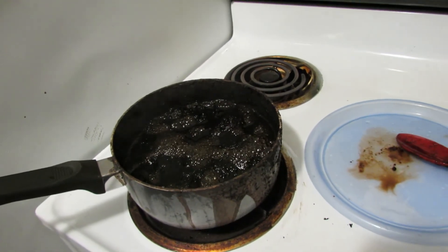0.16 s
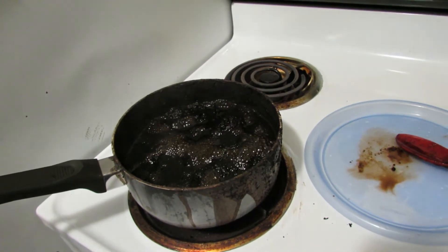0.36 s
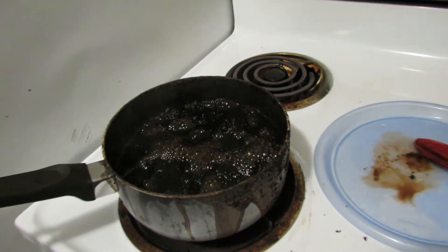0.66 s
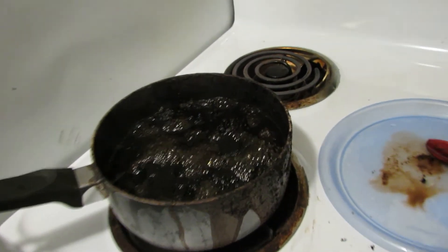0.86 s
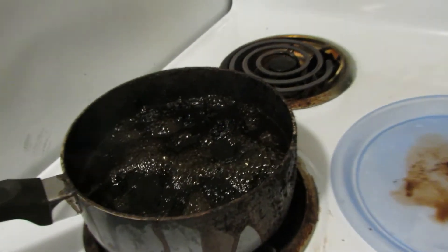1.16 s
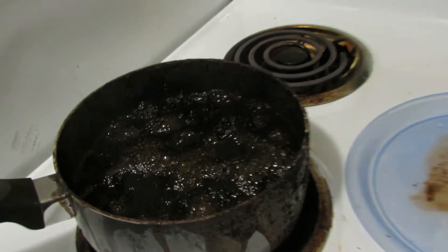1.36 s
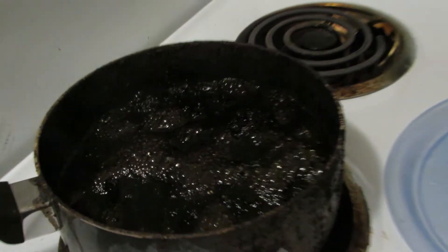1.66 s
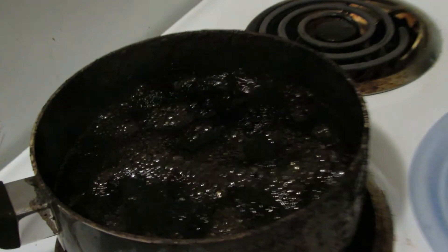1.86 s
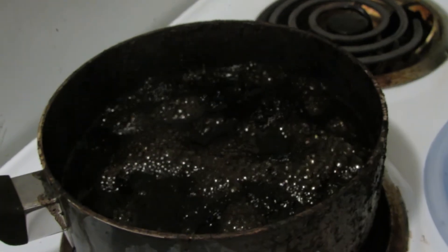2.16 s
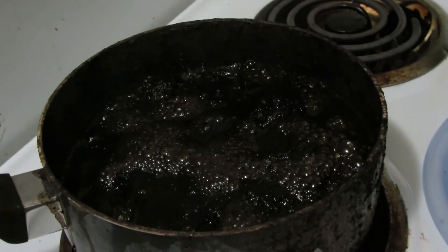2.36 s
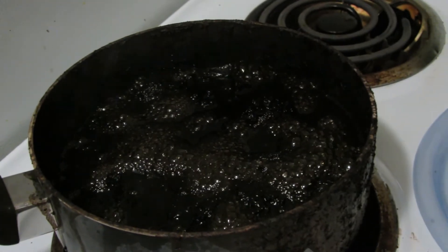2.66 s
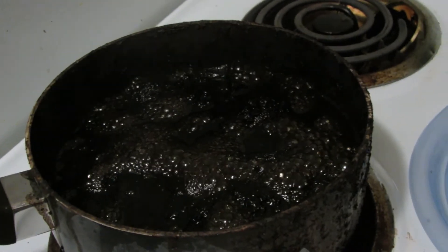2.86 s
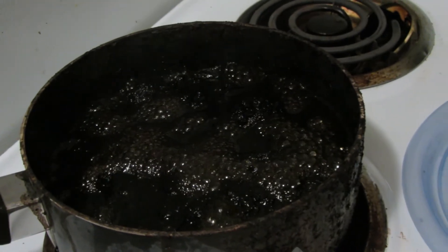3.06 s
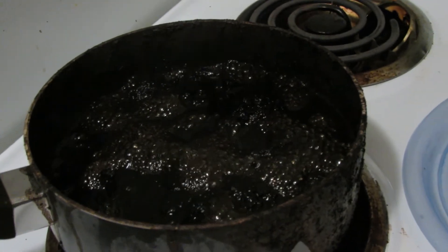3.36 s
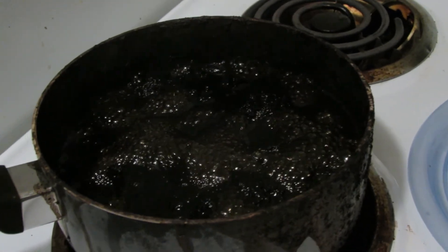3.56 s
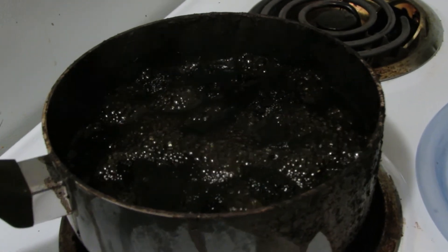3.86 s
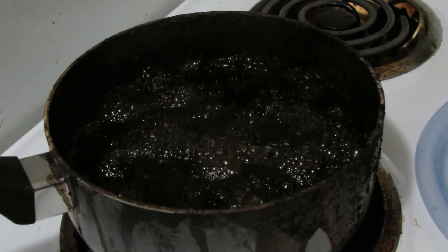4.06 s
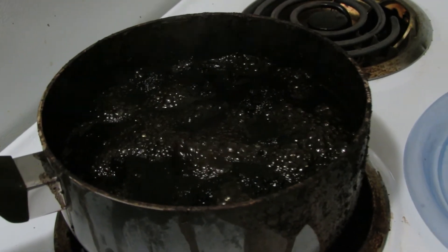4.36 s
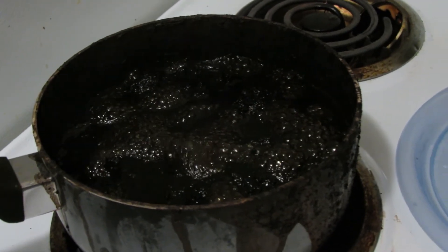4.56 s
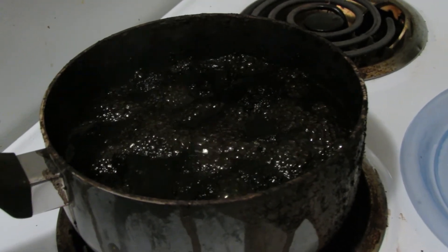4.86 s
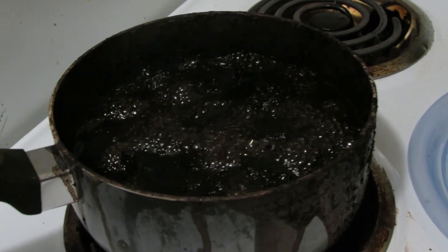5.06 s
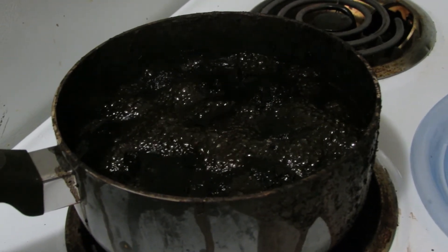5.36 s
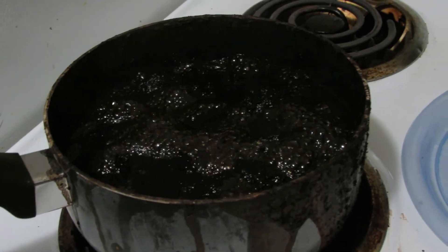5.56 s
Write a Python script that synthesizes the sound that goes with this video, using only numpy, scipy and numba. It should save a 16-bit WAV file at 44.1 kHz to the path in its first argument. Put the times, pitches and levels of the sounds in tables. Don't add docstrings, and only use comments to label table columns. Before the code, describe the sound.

Close, quiet bubbling with small pops and steam spits; a hard rattling snap near two seconds briefly dips everything, then bubbling returns.

```python
import sys
import numpy as np
from scipy import signal
from scipy.io import wavfile
from scipy.ndimage import uniform_filter1d
from numba import njit

SR = 44100
rng = np.random.default_rng(int(sys.argv[2]) if len(sys.argv) > 2 else 0)


def how_loud(loudness_db):
    steps = np.asarray(loudness_db, float) / 20
    return 10 ** steps


def file_out(sig):
    cols = np.atleast_2d(sig).T
    lim = np.clip(cols, -1, 1)
    pcm = np.round(lim * 32767).astype(np.int16)
    wavfile.write(sys.argv[1], SR, pcm)


N = 251546
WHITE = rng.standard_normal((3, N))

# frequency in Hz, density in dB per Hz.
GURGLE_COLOUR = [(59, -34), (100, 2.5), (253, -2.5), (464, -8), (531, -11), (714, -7), (1330, -15.5),
                 (1580, -21), (2500, -19), (3250, -51), (5500, -120)]


def on_log(table, hz):
    f, v = np.transpose(table)
    return np.interp(np.log(hz), np.log(f), v)


def curves(table):
    s, *columns = np.transpose(table)
    return [np.interp(np.arange(N) / SR, s, c) for c in columns]


def level(x):
    return x / np.sqrt(np.mean(x ** 2))


def sides(pan_db):
    return how_loud(np.array([pan_db, -pan_db]) / 2)


def add(out, start, x):
    out[:, start:start + x.shape[1]] += x


def walk(rate_hz):
    k = int(SR / rate_hz)
    held = np.repeat(rng.standard_normal(N // k + 1), k)
    return 1.63 * uniform_filter1d(uniform_filter1d(held, k), k)[:N]


def band(x, hz, width_hz):
    edges_hz = [max(hz - width_hz / 2, hz / 8), min(hz + width_hz / 2, .48 * SR)]
    return signal.sosfilt(signal.butter(2, edges_hz, "band", fs=SR, output="sos"), x)


@njit
def rings(start, hz, t60, glide, gain, phase):
    out = np.zeros((2, N))
    for e in range(len(start)):
        z = 1. + 0j
        w = 2 * np.pi * hz[e] / SR
        decay = np.exp(-np.log(1000) / (t60[e] * SR))
        turn = np.exp(1j * phase[e])
        for i in range(start[e], min(N, start[e] + int(t60[e] * SR))):
            soft = min(1., (i - start[e]) * w / 3)
            out[0, i] += gain[0, e] * soft * z.imag
            out[1, i] += gain[1, e] * soft * (z * turn).imag
            z *= decay * np.exp(1j * w)
            w = min(w * (1 + glide / (t60[e] * SR)), 2.8)
    return out


def burst(s, db, hz, width_hz, t60, pan_db, rise_s):
    t = np.arange(min(int(t60 * SR) + 8, N - int(s * SR))) / SR
    at = int(rng.random() * (N - SR))
    noise = WHITE[:, at:at + len(t)]
    puff = band(noise[0] + 1.37 * noise[1:], hz, width_hz) / np.sqrt(width_hz / SR * 3)
    envelope = np.minimum(t / rise_s, 1) * how_loud(-60 * t / t60)
    return int(s * SR), how_loud(db) * sides(pan_db)[:, None] * puff * envelope


def wash(colour, lo_hz, hi_hz, swell_db, flicker_db, flicker_hz):
    # frequency in Hz, share of power common to both ports.
    likeness = [(40, 0.2), (120, 0.78), (300, 0.029), (1400, 0.07), (7000, 0.26), (15000, 0.083)]
    # frequency in Hz, left minus right in dB.
    balance = [(60, -7.5), (400, -3), (2400, -3), (4400, 0.5), (15000, -2.5)]
    out, swell = 0, walk(2.86)
    for hz in lo_hz * 2 ** np.arange(0, np.log2(hi_hz / lo_hz), 1 / 3):
        share = np.clip(on_log(likeness, hz), 0, 1)
        noise = np.roll(WHITE, rng.integers(N), axis=1)
        pair = band(np.sqrt(share) * noise[0] + np.sqrt(1 - share) * noise[1:], hz, .232 * hz)
        db = on_log(colour, hz) + swell_db * swell + flicker_db * walk(flicker_hz)
        out = out + how_loud(db) * sides(on_log(balance, hz))[:, None] * pair
    return level(out)


def grains(colour, lo_hz, hi_hz, cycles, spread_db, glide, count):
    when, pitch, rarity, place, turn = rng.random((count, 5)).T
    hz = lo_hz * (hi_hz / lo_hz) ** pitch
    size = how_loud(on_log(colour, hz) + 10 * np.log10(hz) - spread_db * np.log(1.03 - rarity))
    gain = size * sides(8 * (place - .5) - 2.5)
    return level(rings((when * N).astype(np.int64), hz, cycles / hz, glide, gain, 3 * (turn - .5)))


def simmer():
    # frequency in Hz, density in dB per Hz.
    fizz_colour = [(710, -32), (1200, 6.5), (1680, -1), (2130, -7.5), (2710, -2), (3700, -10), (7570, -6),
                   (11900, -12), (15200, -14.5), (16000, -17)]
    # time in seconds, level in dB about the mean.
    vigour = [(0, 5.5), (.12, -3), (.33, 0), (.5, 7.5), (.7, 9), (1.24, 3.5), (1.65, 2.5), (1.78, 5.5),
              (1.95, 0.5), (2.3, -1.5), (2.72, 1.5), (3.13, -1), (3.5, 1), (4.0, 2), (4.4, -3.5),
              (4.64, 2.5), (4.78, 0.5), (5.704, 0)]
    # centre in Hz, width in
    # Hz, level in dB.
    faint_bands = [(2700, 120, -64.5), (3400, 180, -66), (4130, 750, -64)]
    boil_db, = curves(vigour)
    fine = wash(fizz_colour, 4960, 16500, 0.26, 0.71, 16)
    fine = fine + how_loud(-6) * grains(fizz_colour, 4160, 13400, 7.5, 4.6, 0.37, count=4000)
    coarse = wash(fizz_colour, 1583, 4000, 0.27, 1.8, 18)
    coarse = coarse + how_loud(-5.0) * grains(fizz_colour, 1360, 3900, 10.2, 1.3, 0.75, count=2000)
    gurgle = wash(GURGLE_COLOUR, 369.0, 1300, 0.3, 2.44, 14)
    gurgle = gurgle + how_loud(-4.0) * grains(GURGLE_COLOUR, 313.0, 1810, 3.8, 2.3, 0.35, count=1600)
    top = signal.ellip(10, .2, 80, 15880, fs=SR, output="sos")
    out = how_loud(-53 + 0.059 * boil_db) * signal.sosfilt(top, fine)
    out = out + how_loud(-55 + 0.35 * boil_db) * coarse + how_loud(-51.5 + boil_db) * gurgle
    for hz, width_hz, db in faint_bands:
        out = out + how_loud(db) * level(band(WHITE[1:], hz, width_hz))
    return out


def pops():
    # start in seconds, peak in dB, pitch in Hz, left minus right
    # in dB.
    tuned_pops = [(0.104, -37.5, 1520, -21), (0.349, -28, 2520, -2), (0.575, -17, 1380, -3),
                  (0.994, -29, 840, -5), (1.396, -33.5, 2080, -11), (1.435, -24.5, 970, -3),
                  (1.473, -30, 820, -7), (1.625, -28.5, 910, -6), (1.968, -26, 600, -11), (2.27, -24, 1040, -13),
                  (2.282, -32, 844, -9), (3.523, -22, 1668, -3), (3.532, -27.5, 1260, -3.5),
                  (3.568, -30, 845, -2), (3.776, -27, 815, -3), (3.881, -33, 1560, -2), (3.978, -24, 948, -3),
                  (4.004, -25, 2080, -3), (4.139, -27.5, 835, -3), (4.214, -32, 1527, -5),
                  (4.245, -30.5, 1120, -2), (4.571, -29, 1826, -15), (4.607, -30, 1293, -2),
                  (4.613, -19.5, 2510, -6), (4.636, -23.5, 1890, -9.5), (4.83, -31, 981, -6),
                  (4.946, -31.5, 1568, -6), (5.269, -27.5, 1580, -4), (5.582, -36.5, 1470, -2),
                  (5.681, -32, 790, -6)]
    # start
    # in seconds, peak in dB.
    further_pops = [(0.048, -33.5), (0.269, -37), (0.458, -44), (0.66, -37), (0.869, -41), (1.227, -34),
                    (1.664, -34), (1.695, -36), (2.503, -46), (2.557, -32), (2.656, -33), (2.69, -39),
                    (2.919, -41), (3.109, -37), (3.188, -39), (3.292, -35), (3.355, -36.5), (3.393, -35),
                    (3.583, -33), (3.861, -38), (3.922, -36.5), (3.957, -42), (4.081, -34), (4.104, -39),
                    (4.359, -36), (4.389, -33.5), (4.578, -38), (4.703, -34.5), (4.79, -42), (5.134, -32)]
    # mode in Hz, level in dB, t60 in
    # seconds.
    body_modes = [(290, 2.5, 0.031), (467, 1, 0.046), (630, -7.5, 0.023), (840, 1, 0.024),
                  (1046, -0.5, 0.028), (1450, -1.5, 0.017), (1755, -1, 0.011), (2400, -3, 0.012)]
    common_hz = 827
    spread = rng.standard_normal((len(further_pops), 2))
    plops = [(s, db, common_hz * np.exp(0.17 * a), -6 + 1.6 * b) for (s, db), (a, b) in zip(further_pops, spread)]
    rows = np.array(tuned_pops + plops)
    s, db, pitch_hz, pan_db = rows.T
    low_db = -8.5 - 5 * np.log2(pitch_hz / common_hz)
    start = ((s + 0.00032) * SR).astype(np.int64)
    phase = 0.12 + .5 * rng.standard_normal(len(s))
    out = rings(start, pitch_hz, 15 / pitch_hz, 0.053, how_loud(db - 3.5) * sides(pan_db), phase)
    for hz, mode_db, t60 in body_modes:
        u = rng.standard_normal((len(s), 3)).T
        octaves = np.log2(hz / pitch_hz)
        if hz < 600:
            part_db = low_db - 3.0
        else:
            part_db = -5 - 7 * np.abs(octaves) - 9 * np.maximum(octaves - .6, 0)
        gain = how_loud(db + part_db + mode_db + 2.8 * u[0]) * sides(pan_db)
        late = start + (SR / hz + np.abs(u[1]) * .00012 * SR).astype(np.int64)
        out += rings(late, hz * (1 + 0.054 * u[1]), t60 + 0 * s, 0.12, gain, 0.73 + 0.82 * u[2])
    for at, peak_db, hz, pan in rows:
        add(out, *burst(at, -48 + .3 * (peak_db + 28), 5900, 9000, 0.0066, pan, .0003))
        add(out, *burst(at, peak_db - 22.5, hz, 0.81 * hz, 0.17, pan, 0.00099))
    lag = int(.0085 * SR)
    out[:, lag:] += how_loud(-11.0) * out[::-1, :-lag]
    return out


def spits():
    # start in seconds, peak in dB, centre in Hz, sharp front in dB, t60 in seconds.
    hisses = [(0.076, -36.5, 3500, -7, 0.21), (0.3486, -38, 3320, -22, 0.15),
              (0.6165, -37.5, 3675, -8, .13), (0.7928, -35.5, 8310, -9, 0.091),
              (0.894, -38, 8330, -18, 0.12), (0.999, -37, 6440, -12, 0.2), (1.651, -38, 8500, -16, .13),
              (2.018, -29.5, 5080, -20, 0.31), (2.5895, -33.5, 9070, -12, 0.097),
              (2.829, -33, 11020, -14, 0.042), (2.848, -38, 7020, -12, .08), (3.1255, -36, 8120, -17, 0.19),
              (3.3976, -34, 8500, -11, 0.15), (3.557, -33.5, 9000, -11, .12), (3.576, -32, 5490, -26, 0.27),
              (3.605, -30, 5070, -28, 0.33), (3.785, -36.5, 8000, -14, .15),
              (3.9705, -32.5, 5500, -28, 0.2), (3.985, -40, 9000, -13, 0.1), (4.213, -41, 3060, -22, .03),
              (4.3993, -37, 5350, -30, 0.26), (4.5714, -40, 2600, 8, .03), (4.579, -40, 3000, 6, .03),
              (4.6134, -37, 3430, -4, .03), (4.629, -21.5, 5660, -12, 0.084), (4.64, -28.5, 5500, -14, .45),
              (5.135, -36.5, 7670, -15, 0.15), (5.1866, -37, 8210, -15.5, 0.12),
              (5.267, -35.5, 6960, -25, 0.15), (5.311, -36, 7750, -22, .3),
              (5.353, -37.5, 6360, -16.5, .25), (5.4456, -35.5, 8600, -16, .13),
              (5.579, -36.5, 6756, -6, 0.097), (5.669, -40, 7000, -22, 0.31),
              (5.679, -25.5, 7950, -13, 0.32), (5.694, -36, 6000, -17, .39)]
    out = np.zeros((2, N))
    for s, db, hz, front_db, t60 in hisses:
        pan_db = -1.5 + 2.5 * np.log2(hz / 7000)
        add(out, *burst(s, db - 10.0, hz, 0.98 * hz, t60, pan_db, 0.0019))
        add(out, *burst(s, db + front_db + 0.5, 10300, 8700, 0.35 * t60, pan_db, 0.0016))
    return out * how_loud(1.25 * walk(450) - 3.5)


TICK_PAN_DB = -2


def ticks():
    # start in seconds, peak in dB, pitch in Hz.
    tears = [(0.0763, -34, 3260), (0.5177, -39, 2720), (0.7, -37.5, 2640), (1.9695, -27, 1800),
             (1.969, -35, 3400), (2.07, -36.5, 702), (2.136, -37.5, 4060), (2.205, -41, 2400),
             (2.222, -41, 700), (2.412, -37.5, 889), (2.441, -35.5, 2880), (2.5047, -37.5, 1850),
             (2.507, -39.5, 4990), (3.1206, -39, 2700), (3.295, -42, 2486), (3.3303, -39, 3334),
             (3.335, -35.5, 1494), (3.3573, -37.5, 2510), (3.4264, -44, 2040), (3.577, -36.5, 2730),
             (3.6078, -31, 3440), (3.609, -36, 5200), (3.776, -41, 2724), (3.8737, -44, 3500),
             (3.886, -31.5, 484), (3.923, -37, 1802), (3.924, -37.5, 3300), (3.9713, -34, 2090),
             (3.989, -31.5, 905), (4.0035, -37, 2600), (4.05, -41, 1000), (4.0797, -45, 2000),
             (4.1045, -40, 2544), (4.104, -42, 4990), (4.1626, -38.5, 2300), (4.213, -41.5, 4560),
             (4.2884, -42, 2790), (4.3984, -35.5, 3320), (4.401, -34, 4670), (4.438, -41, 4000),
             (4.5712, -32, 4310), (4.579, -34, 3995), (4.6132, -34, 4500), (4.6354, -31, 5500),
             (4.7902, -38, 1820), (4.895, -40.5, 7500), (4.9, -42, 1703), (5.1362, -41, 2050),
             (5.2415, -42, 4180), (5.336, -40, 1500), (5.505, -40, 810), (5.607, -38, 1196),
             (2.271, -27.5, 1602), (2.284, -32, 1500), (3.111, -40, 1720), (1.972, -35, 292),
             (4.39, -36, 1280), (3.731, -44, 781), (3.837, -39, 820), (4.399, -33, 1100),
             (4.6335, -28, 6500), (4.082, -35, 870)]
    s, db, hz = np.transpose(tears)
    u = rng.standard_normal((len(s), 2)).T
    pan_db = TICK_PAN_DB + 1.2 * u[0]
    start, gain = (s * SR).astype(np.int64), how_loud(db - 1.0) * sides(pan_db)
    out = rings(start, hz, 18.4 / hz, 0.092, gain, 0.38 * u[1])
    for at, peak_db, pitch_hz, pan in zip(s, db, hz, pan_db):
        add(out, *burst(at, peak_db - 8.5, 0.92 * pitch_hz, 0.66 * pitch_hz, 0.03, pan, 0.00058))
    return out


def whistles():
    # start in seconds, peak in dB, centre in Hz, width in Hz, t60 in seconds.
    narrow_bands = [(0.0, -47.5, 128, 30, 0.55), (0.23, -51, 3280, 350, 0.47), (3.105, -50, 2694, 200, .25),
                    (3.12, -51, 1704, 200, .2), (2.6, -50, 2700, 250, .15), (4.89, -50, 1700, 250.4, 0.077),
                    (5.3, -48, 1150, 200, 0.18), (5.35, -52, 3350, 250, .06), (2.76, -50, 1700, 250, .06),
                    (3.25, -51, 268.3, 24, 0.57), (2.51, -53, 1690, 250, 0.21), (5.08, -60, 2800, 250, 0.23),
                    (5.46, -59, 3306, 250, 0.28), (5.679, -23.5, 8000, 1804, 0.071), (5.68, -29, 12800, 2500, .04),
                    (5.68, -39, 4800, 899, 0.094)]
    out = np.zeros((2, N))
    for s, db, hz, width_hz, t60 in narrow_bands:
        add(out, *burst(s, db, hz, width_hz, t60, TICK_PAN_DB, 0.02))
    return out


def snap():
    # start in seconds, level in dB, brightness in dB, left minus right in dB.
    blows = [
        (1.7930, -23, -12, -7),
        (1.8122, -12, -9, -15),
        (1.8152, 1.5, -11, -0.5),
        (1.8166, -3.5, 5, -2),
        (1.8183, -3, -7.5, -9),
        (1.8219, 3, -9.5, -6.5),
        (1.8238, -9.5, -8, -11),
        (1.8307, -4.5, -2, 4.5),
        (1.833, -8.5, -1.5, -2),
        (1.8366, -13, -9, -13.5),
    ]
    # mode in Hz, level in dB, t60 in seconds, phase between the ports in rad,
    # left minus right in dB.
    shell = [(524, -19, 0.0044, 3.4, 10), (756, 2, 0.022, 2.88, 0), (1025, -6, 0.025, 3.6, -0.5),
             (1337, -1.5, 0.035, 2.7, 4.5), (1490, -2.5, 0.019, 5, 15), (1690, -8, 0.026, 0.75, -10),
             (1980, -2, 0.0088, 0.86, -17), (2065, -4.5, 0.017, 2.9, -8), (2210, -11, 0.017, 3.65, -22),
             (2800, -17, 0.019, 1.8, -11), (3260, -10, 0.025, 1.2, -1), (4030, -3, 0.0094, 5.7, 10),
             (5270, -7.5, 0.0092, 1.56, -12), (6240, -7.5, 0.0071, 1.8, -4)]
    out = np.zeros((2, N))
    hz, mode_db, t60, phase, mode_pan_db = np.transpose(shell)
    for s, db, bright_db, pan_db in blows:
        u = rng.standard_normal((3, len(hz)))
        ring_db = db - 12.5 + mode_db + bright_db * (hz > 3000) + 1.5 * u[0]
        gain = how_loud(ring_db) * sides(pan_db + mode_pan_db)
        start = ((s + .0002 * np.abs(u[2])) * SR).astype(np.int64)
        out += rings(start, hz * (1 + 0.0086 * u[1]), t60, 0., gain, phase + 0.26 * u[2])
        add(out, *burst(s, db + bright_db - 19.5, 8900, 15600, 0.013, pan_db - 8.0, 0.00076))
    for echo_db, echo_t60 in [(-23, 0.14), (-33, 0.59)]:
        start, echo = burst(1.83, echo_db, 1660, 2260, echo_t60, -2.0, 0.0032)
        add(out, start, band(echo, 1620, 1670))
    return out


def engine():
    # time in seconds, firing rate in Hz, firing line in dB, panel buzz in dB.
    running = [(0.0, 91.9, -53, -51), (0.24, 89.6, -62.5, -69.5), (0.8, 92.6, -54.5, -57.5),
               (0.93, 94.8, -52, -47), (1.27, 97.4, -49, -50.5), (1.36, 97.7, -64, -64),
               (1.58, 97.7, -45, -69), (1.8, 97.8, -42, -64), (1.95, 97.26, -52, -71),
               (2.3, 97.8, -48, -67), (2.65, 100, -41, -67), (3.4, 104.5, -40.5, -53.5),
               (3.5, 111.6, -46.5, -70), (3.7, 115.4, -44.5, -63), (4.55, 116.5, -45, -66),
               (4.96, 114.1, -51.5, -69), (5.21, 107.1, -50.5, -71), (5.7, 107.1, -53, -64)]
    # order of the cycle, level in dB under the firing line.
    minor_orders = [(7, -14), (9, -12.5)]
    # frequency in Hz, level in dB under the firing line.
    wall_loss = [(140, -1), (152, -13), (163, -19), (170, -9.5), (186, -5.5)]
    # time in seconds, level in dB.
    fifth_order = [(0, -63), (.74, -62), (.83, -45), (1.08, -45), (1.16, -59), (3.4, -61), (3.55, -55),
                   (4.6, -59), (5.4, -52), (5.7, -56)]
    hz, firing_db, buzz_db = curves(running)
    cycle = 2 * np.pi * np.cumsum(hz * (1 + .004 * walk(12))) / SR / 8
    upper_db = firing_db + on_log(wall_loss, hz * 13 / 8)
    lines = [(8, firing_db), (5, curves(fifth_order)[0]), (13, upper_db), (16, buzz_db)]
    lines += [(k, firing_db + db) for k, db in minor_orders] + [(12, upper_db - 0.5)]
    lag = np.array([[.35], [-.35]])
    hum = 0
    for k, db in lines:
        line_amp = how_loud(db + 1.0 * walk(14))
        phase = 2 * np.pi * rng.random() + lag * (1.35 + 0.57 * walk(8.5))
        hum = hum + line_amp * np.sin(k * cycle + phase)
    return how_loud(1.5) * sides(-5.0)[:, None] * hum


def kitchen():
    # time in seconds, swell in dB about the mean.
    house_swell = [(0, -4), (.45, 7.5), (.73, 3.5), (1.0, 0), (1.3, 4.5), (1.54, 4), (1.68, 3.5), (2.2, 5),
                   (2.6, 4.5), (3.5, 2), (4.29, 6), (5.08, -2), (5.35, -2), (5.7, -7)]
    swell_db, = curves(house_swell)
    rumble = wash([(25, -8), (50, 2), (90, -1)], 31.2, 90, 0.49, 1.1, 5.7)
    drone = wash(GURGLE_COLOUR, 92.0, 320, 1.0, 1.8, 14)
    drone_db = -53 + 0.49 * swell_db + 0.88 * np.arange(N) / SR
    return how_loud(-55 + swell_db) * rumble + how_loud(drone_db) * drone


def scene():
    return simmer() + pops() + spits() + ticks() + whistles() + snap() + engine() + kitchen()


def band_limit(x):
    return signal.sosfilt(signal.butter(12, 16510, fs=SR, output="sos"), x)


def record(dry):
    duck_start_s, duck_db, attack_s, release_s = 1.83, -20, 0.044, 0.5
    since_s = np.maximum(np.arange(N) / SR - duck_start_s, 0)
    gain_db = duck_db * (1 - np.exp(-since_s / attack_s)) * np.exp(-since_s / release_s)
    top = signal.ellip(8, .1, 60, 16400, fs=SR, output="sos")
    mix = signal.sosfilt(top, np.clip(dry, -1, 1) * how_loud(gain_db))
    return band_limit(mix)


dry = scene()
out = record(dry)
file_out(out)
```